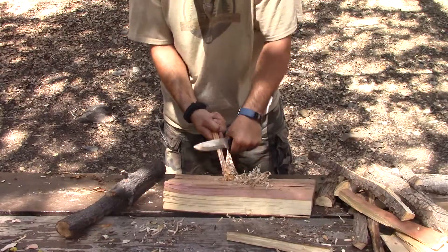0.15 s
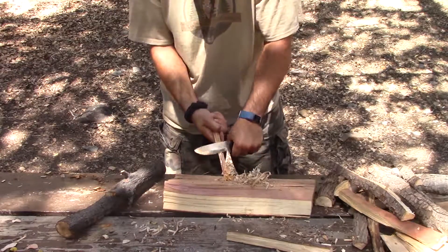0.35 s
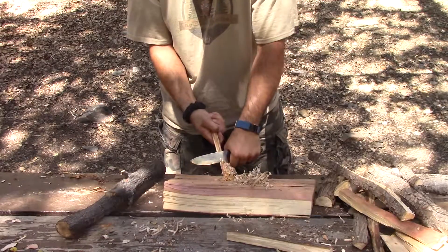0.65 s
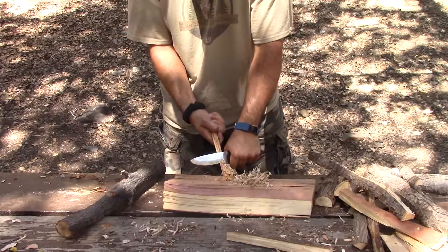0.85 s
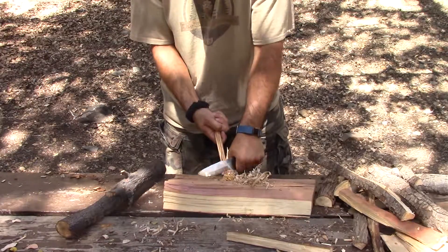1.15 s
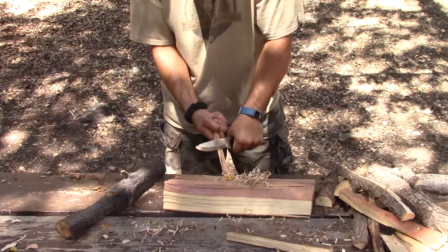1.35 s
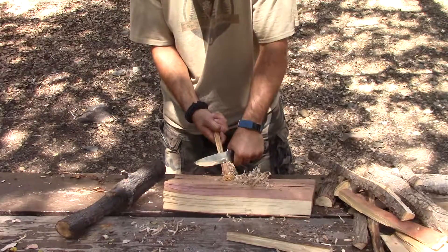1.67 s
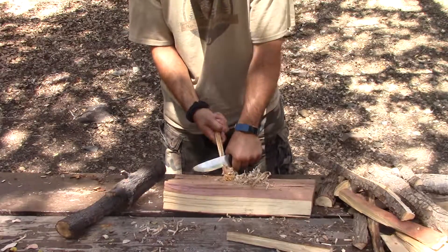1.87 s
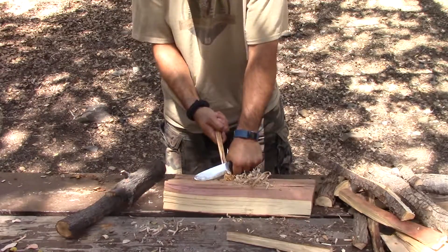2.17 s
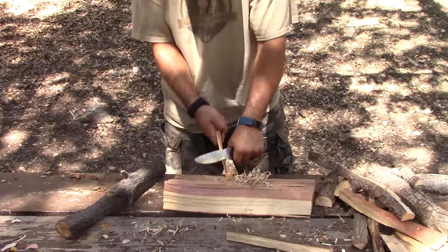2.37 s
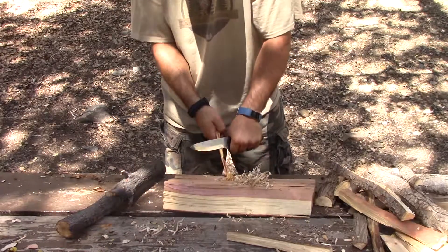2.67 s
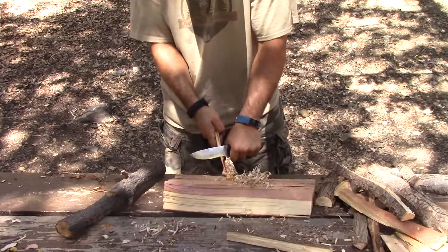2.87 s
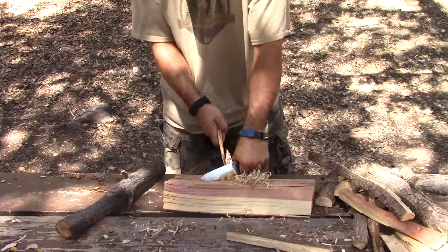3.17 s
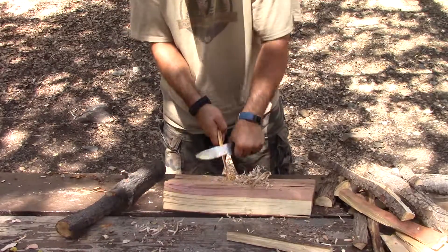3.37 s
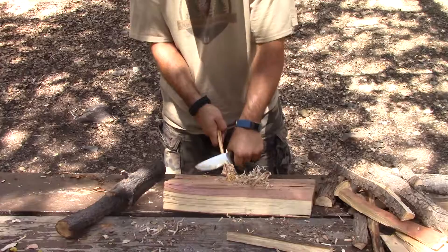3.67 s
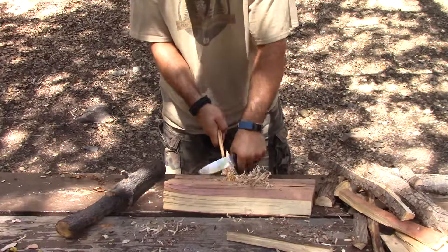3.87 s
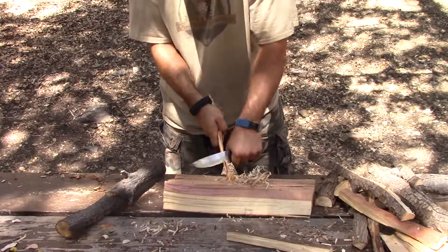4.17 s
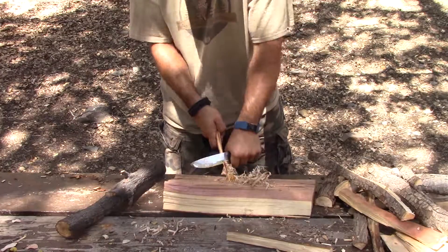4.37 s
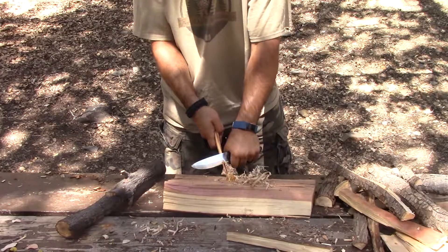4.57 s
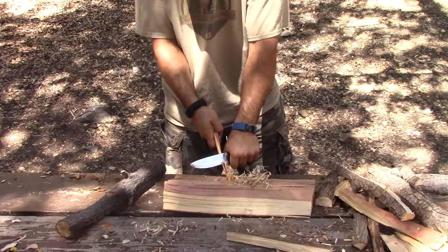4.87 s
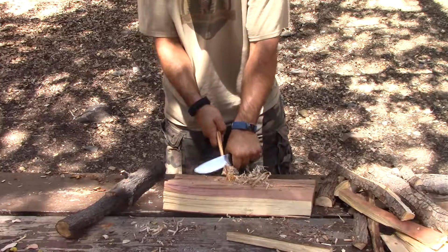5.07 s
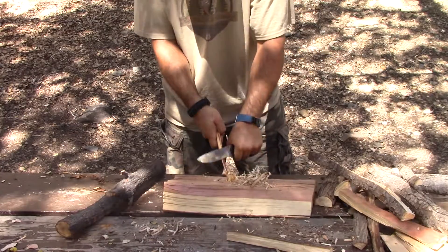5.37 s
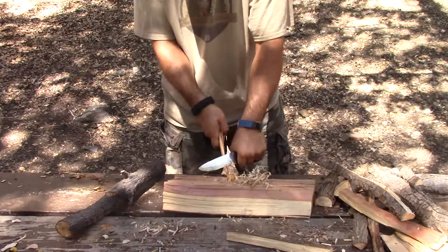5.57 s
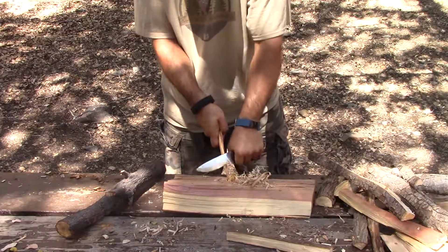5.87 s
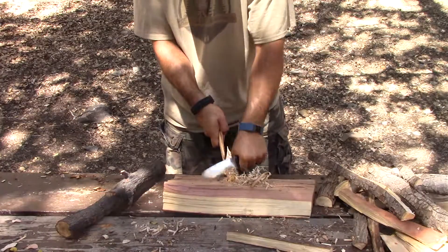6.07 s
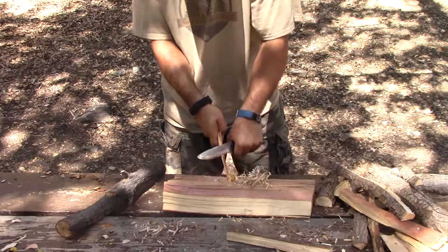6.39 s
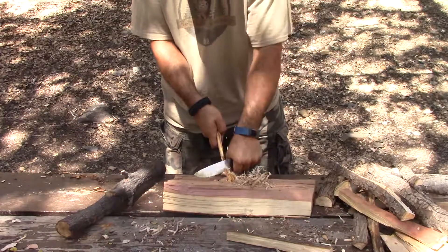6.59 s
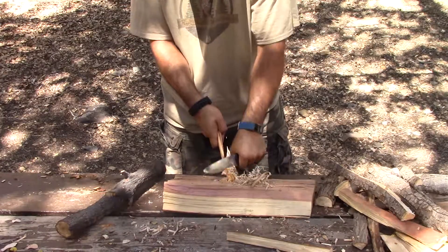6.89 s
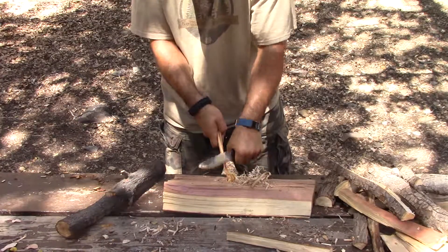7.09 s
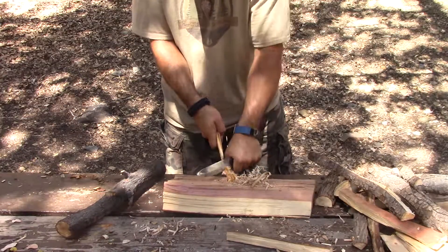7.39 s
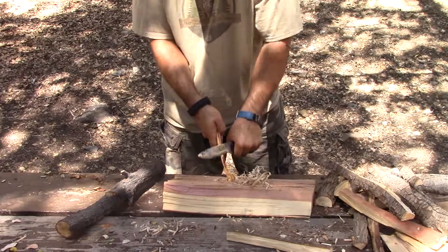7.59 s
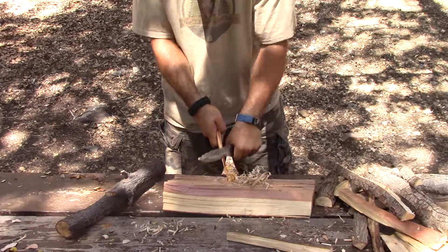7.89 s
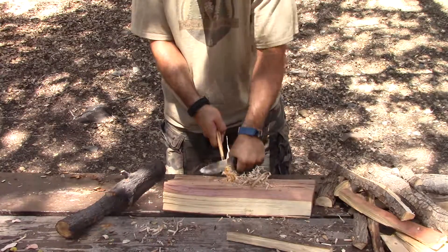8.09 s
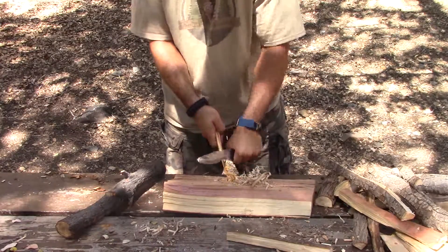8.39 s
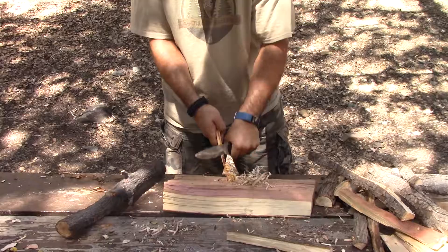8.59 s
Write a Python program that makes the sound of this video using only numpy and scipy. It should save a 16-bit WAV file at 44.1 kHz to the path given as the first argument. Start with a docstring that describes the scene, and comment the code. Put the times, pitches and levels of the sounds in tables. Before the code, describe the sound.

A knife whittles a stick braced on a wooden block outdoors. Short, uneven rasping strokes tear the fibres and resonate in the wood, with light slides of the blade between cuts and a few crisp splinter snaps. Midway the blade catches with a sharp knock, then the strokes grow louder and more regular. A breeze bumps the microphone now and then, over a soft hush with a faint distant bird and insect.

```python
"""Whittling a stick outdoors

A knife shaves curls from a stick whose tip rests on a wooden block. Each stroke tears fibres in a
rapid, uneven chatter that rings stick and block and sinks in pitch as the curl grows. The blade slides
back lightly between cuts and splinters snap. A breeze buffets the microphone, the table thuds dully
under some strokes; far off, a bird and an insect.
"""
import sys
import numpy as np
from scipy import signal
from scipy.fft import rfft, irfft
from scipy.io import wavfile
from scipy.ndimage import uniform_filter1d

SR = 44100
rng = np.random.default_rng(int(sys.argv[2]) if len(sys.argv) > 2 else 0)


def to_wav(sig):
    """Store sig (one row per channel, or 1-D mono) as 16-bit WAV at the path in sys.argv[1].

    Samples outside -1..1 are clipped; the rate is SR.
    """
    pcm = np.clip(np.atleast_2d(sig), -1, 1) * 32767
    pcm = np.round(pcm).astype(np.int16)
    wavfile.write(sys.argv[1], SR, pcm.T)  # frames by channels


N = 385434
TIME = np.arange(N) / SR

# cutting strokes: start/s, swell/s, taper/s, stick rasp/dB, block knock/dB, edge hiss/dB (relative)
STROKES = [(0.929, 0.063, 0.033, -39.5, -37, -54.5), (2.038, 0.044, 0.079, -48, -42.5, -64),
           (2.748, 0.049, 0.097, -38, -36.5, -60), (3.008, 0.046, 0.17, -43, -41, -58.5),
           (3.581, 0.033, 0.06, -43.5, -41.5, -61.5), (3.675, .055, 0.099, -37.5, -34.5, -54.5),
           (4.096, 0.058, 0.17, -40, -37, -58.5), (5.125, 0.033, 0.056, -35, -47, -54),
           (5.221, 0.031, 0.028, -46.5, -61, -52), (5.607, 0.016, 0.061, -42.5, -34.5, -57.5),
           (5.759, 0.0085, 0.048, -42.5, -37.5, -57.5), (6.104, 0.035, 0.076, -38.5, -34, -53),
           (6.499, 0.082, 0.078, -34.5, -30.5, -53), (6.913, .053, .062, -39.5, -35.5, -52.5),
           (7.276, 0.073, 0.081, -33, -29, -52.5), (7.669, 0.091, 0.046, -30, -30.5, -50),
           (8.061, 0.058, .04, -35, -31.5, -51.5), (8.384, 0.084, 0.069, -31, -27, -50)]
# wood resonances: f/Hz, width/Hz, gain/dB
STICK_MODES = [(786, 123, -6), (872, 33, 0.5), (1057, 58, -4), (1208, 90, -2.5), (1293, 62.5, 3),
               (1646, 32, -7.5), (1854, 120, -18), (2590, 48, -28), (2720, 39, -13.5), (3100, 140, -21.5)]
BLOCK_MODES = [(248, 53, -0.5), (281.7, 52, 2), (410.8, 17, 4.5), (486, 42, -6), (519.6, 22, -1),
               (578, 44, -3.5), (701, 39, -7)]
# spectra of tearing fibres and edge hiss: f/Hz, level/dB
FIBRE_SPECTRUM = [(200, -16.5), (500, 5), (900, -5.5), (1500, -1.5), (2200, -15), (3300, -21), (4800, -26),
                  (12000, -45)]
EDGE_SPECTRUM = [(1000, -35), (2500, 11.5), (4700, -0.5), (5900, 6.5), (7500, 1.5), (8300, -3.5),
                 (9600, 4.5), (11000, -17), (12500, -18), (16000, -19)]


def cutting(grain_db=1.0):
    """The same fractures shake stick, block and table; finer ones hiss at the edge and ring the blade."""
    # resonances of the steel and of the table under the block: f/Hz, width/Hz, gain/dB
    blade_modes = [(2704, 220, 17), (3220, 66, 16), (3880, 115, 10.5), (5940, 280, 12), (7170, 390, 9.5),
                   (9300, 440, 6), (10400, 130, -11), (10620, 470, 6)]
    table_modes = [(105, 81, -10.5), (162, 33, -0.5), (213, 22, 6.5)]
    rasp_db, knock_db, hiss_db = np.transpose(STROKES)[3:]
    # the edge hisses just before it bites; the block answers later, as the blade nears it
    rasp = push(rasp_db, light_db=26, shape=2.04, release_s=0.0099)
    knock = push(knock_db, light_db=19, shape=2.02, release_s=0.02, lag_s=0.024)
    hiss = push(hiss_db, light_db=13.5, shape=2.6, release_s=0.0017, lag_s=-0.004)
    thrum = push(knock_db, light_db=28, shape=1.14, release_s=0.013, lag_s=0.021)
    grain = from_db(grain_db * drift(35))   # hard and soft grain varies the force
    rasp, knock, hiss = rasp * grain, knock * grain, hiss * np.sqrt(grain)
    chatter = fractures(per_s=1000, spread_db=4, clump_db=6)
    stick = from_db(-2) * rasp * steady(through(chatter, ringing(STICK_MODES)), size=1800)
    block = from_db(-7) * knock * steady(through(chatter, ringing(BLOCK_MODES)), size=1100)
    table = from_db(-13) * thrum * steady(through(chatter, ringing(table_modes)), size=1800)
    tearing = rasp * fractures(per_s=1800, spread_db=5, clump_db=9)
    fibres = from_db(-7.5) * through(tearing, response(FIBRE_SPECTRUM))
    wood = curl(lowpass(stick + block, 3700, order=4) + fibres)
    fine_tearing = hiss * fractures(per_s=6400, spread_db=7, clump_db=-1)
    edge = from_db(1.5) * through(fine_tearing, response(EDGE_SPECTRUM))
    blade = from_db(2) * steel(hiss * fractures(per_s=6900, spread_db=-0.5, clump_db=6), blade_modes)
    return wood + table + edge + blade


def push(levels_db, light_db, shape, release_s, lag_s=0):
    """One arch of force per stroke: light_db down at entry and exit, then a quick release."""
    gain = np.zeros(N)
    for (start, swell, taper, *_), db in zip(STROKES, levels_db):
        near = slice(int((start - 0.1) * SR), int((start + swell + taper + 0.15) * SR))
        t = TIME[near] - start - lag_s
        off_peak = np.interp(t, [0, swell, swell + taper], [1, 0, 1])
        outside_s = np.maximum(np.maximum(-t, t - swell - taper), 0)
        gain[near] += from_db(db - light_db * off_peak ** shape) * np.exp(-outside_s / release_s)
    return gain


def fractures(per_s, spread_db, clump_db):
    """Fibres give way singly, unevenly and in clumps; the hand keeps the mean force steady."""
    breaks = rng.random(N) < per_s / SR
    clicks = breaks * from_db(spread_db * rng.standard_normal(N)) * rng.choice([-1, 1], N)
    return steady(clicks * from_db(clump_db * drift(220)), size=800)


def curl(x, start_hz=740, end_hz=120, q=2.4, growth_swells=2.09, size=128):
    """The curl is a lengthening spring: a resonant high-pass that falls through each stroke."""
    pitch_hz = np.full(N, float(end_hz))
    for start, swell, *_ in STROKES:
        at = int(start * SR)
        grown = np.minimum(TIME[:N - at] / (growth_swells * swell), 1)
        pitch_hz[at:] = start_hz * (end_hz / start_hz) ** grown
    out, state = np.zeros(N), np.zeros(2)
    for at, hz in zip(range(0, N, size), pitch_hz[::size]):
        r = np.exp(-np.pi * hz / q / SR)
        feedback = [1, -2 * r * np.cos(2 * np.pi * hz / SR), r * r]
        out[at:at + size], state = signal.lfilter([r, -2 * r, r], feedback, x[at:at + size], zi=state)
    return out


def steel(force, modes):
    """The contact passes nodes and antinodes of the blade, so each mode swells and fades by itself."""
    shares = unit_energy(np.array([from_db(db) * np.sqrt(width) for _, width, db in modes]))
    swells = [rms_one(from_db(5 * np.clip(drift(18), -1.5, 1.5))) for _ in modes]
    ring = sum(share * through(force * swell, ringing([mode], size=1024))
               for share, swell, mode in zip(shares, swells, modes))
    return lowpass(ring, 11500, order=6)


def sliding():
    """Under light pressure the flat of the blade whispers over the grain."""
    # light passes: start/s, length/s, rasp/dB, hiss/dB (relative)
    passes = [(0.046, .26, -59.5, -69.5), (0.312, .172, -48.5, -61.5), (0.42, .276, -57, -65),
              (1.222, .158, -60, -64), (1.51, .187, -53, -64), (1.797, .295, -54, -62),
              (2.396, .19, -58, -68), (2.653, .11, -52.5, -66), (3.321, .19, -52, -65),
              (3.897, .17, -52.5, -64.5), (5.296, .074, -53, -64), (5.62, 0.15, -60, -60),
              (6.66, .196, -71, -70.5), (7.49, .157, -58, -71), (7.89, .142, -62, -66.5),
              (8.275, .078, -58.5, -63), (8.64, .073, -65, -64)]
    # resonances of the rubbed wood and the blade's flat: f/Hz, width/Hz, gain/dB
    rub_modes = [(1046, 24, 13.5), (1280, 40, 17), (1560, 190, -1)]
    flat_modes = [(3000, 400, 12.5), (3830, 160, -9), (5420, 410, 0), (6170, 630, 4), (7400, 370, -6),
                  (9060, 560, -6)]
    rasp, hiss = np.zeros(N), np.zeros(N)
    for start_s, length_s, rasp_db, hiss_db in passes:
        touch = np.sqrt(np.hanning(int(length_s * SR)))
        add(rasp, start_s, from_db(rasp_db) * touch)
        add(hiss, start_s, from_db(hiss_db) * touch)
    rub = fractures(per_s=10000, spread_db=4, clump_db=4.5) * from_db(2.5 * drift(45))
    body = from_db(-6.5) * ringing(rub_modes) + from_db(-0.1) * response(FIBRE_SPECTRUM)
    wood = through(rasp * rub, body)
    flat = from_db(4.7) * steel(hiss * rub * rng.choice([-1, 1], N), flat_modes)
    edge = from_db(-12) * through(hiss * rub * rng.choice([-1, 1], N), response(EDGE_SPECTRUM))
    return wood + flat + edge


def knocks(decay_cycles=1.4, crunch_s=0.0032, size=4096):
    """The blade catches: a dead blow with a brief crunch; stick and block ring on faintly."""
    # catches: t/s, relative peak/dB, f/Hz
    catches = [(0.37, -38.5, 824), (0.943, -34, 667), (1.028, -27.5, 2100), (1.039, -41, 1500),
               (1.28, -47, 860), (2.132, -36, 550), (2.772, -35, 730), (3.057, -34, 1330),
               (3.091, -33, 740), (3.196, -37, 970), (3.445, -45, 1030), (3.802, -35, 525),
               (4.127, -40.5, 905), (4.277, -42.5, 1620), (4.558, -44.5, 565), (5.147, -25.5, 1030),
               (5.155, -26.5, 1410), (5.178, -18, 770), (5.267, -34.5, 1670), (6.127, -34.5, 1320)]
    out, t = np.zeros(N), TIME[:size]
    body = lowpass(from_db(-5.5) * ringing(STICK_MODES) + from_db(-4) * ringing(BLOCK_MODES), 3000, 2)
    for s, db, hz in catches:
        burst = rng.standard_normal(size) * np.exp(-t / crunch_s)
        crunch = through(burst, response(FIBRE_SPECTRUM))[:size]
        thud = np.sin(2 * np.pi * hz * t) * t * np.exp(-2 * t * hz / decay_cycles)
        blow = unit_energy(thud) + body + from_db(-2) * unit_energy(crunch)
        add(out, s, from_db(db + 8) * blow / np.abs(blow).max())
    return out


def snaps(crack_s=0.0021, tail_s=0.0061, tail_db=-15, size=1400):
    """A splinter breaks in a bright crack; the last fibres tear away in a few milliseconds."""
    # splinter breaks: t/s, peak/dB
    breaks = [(0.054, -31), (1.0154, -43), (1.0298, -26), (1.301, -43), (1.9771, -24.5), (2.287, -38),
              (2.369, -41), (2.4465, -41.5), (4.554, -42.5), (4.81, -44), (5.7347, -30), (5.7399, -28),
              (5.7972, -32.5)]
    # crack spectrum: f/Hz, level/dB
    spectrum = [(300, -49), (1500, 6.5), (2600, -0.5), (4000, -0.5), (6500, 4.5), (10000, -0.5),
                (13000, -8), (16000, -11)]
    out, t = np.zeros(N), TIME[:size]
    decay = np.exp(-t / crack_s) + from_db(tail_db) * np.exp(-t / tail_s)
    for s, db in breaks:
        crack = through(rng.standard_normal(size) * decay, response(spectrum))
        add(out, s, from_db(db) * crack / np.abs(crack).max())
    return out


def yard(x, t60_s=0.17, wet_db=-15, size=16384):
    """Table, ground and trees scatter a faint, short tail."""
    t = TIME[:size]
    tail = unit_energy(rng.standard_normal(size) * from_db(-60 * t / t60_s) * (t > 0.005))
    return x + from_db(wet_db) * through(lowpass(x, 3000, order=1), tail)


def rumble(lump_db=3, upper_growth=1.54):
    """Lumpy low noise: breeze on the microphone, plus dull table thuds under some knife strokes."""
    # low rumble level: t/s, level/dB
    levels = [(0.0, -51), (0.36, -45.5), (0.41, -25.5), (0.51, -44.5), (0.56, -29.5), (0.63, -51),
              (1.22, -58), (1.31, -36), (1.6, -51.5), (1.65, -33), (1.75, -58.5), (1.85, -40), (2.43, -52),
              (2.94, -39), (3.21, -60), (4.16, -57.5), (4.18, -41.5), (4.53, -72), (4.55, -46.5),
              (5.11, -77), (5.16, -41), (5.47, -72), (5.6, -41.5), (6.52, -67.5), (6.6, -49.5),
              (7.16, -56.5), (8.03, -56.5), (8.15, -28.5), (8.3, -40), (8.74, -44.5)]
    # spectra of the deep and upper bands: f/Hz, level/dB
    deep_spectrum = [(25, -56.5), (50, -10), (80, -6), (130, 4), (200, 2), (300, -8), (450, -23.5),
                     (800, -33.5), (6000, -93)]
    upper_spectrum = [(80, -38.5), (200, 6.5), (320, 1), (520, -8.5), (800, -17.5), (1400, -40.5),
                      (9000, -91)]
    level_db = np.interp(TIME, *np.transpose(levels)) + lump_db * drift(55)
    deep = from_db(level_db - 0.27) * steady(noise(deep_spectrum), size=2200)
    upper_db = -55 + upper_growth * (np.minimum(level_db, -38) + 46)
    return deep + from_db(upper_db) * noise(upper_spectrum)


def eddies(width_s=0.0036, wander=0.23, size=4096):
    """An eddy swells and dies within a few uneven pressure swings."""
    # eddies hitting the microphone: t/s, relative peak/dB, f/Hz
    hits = [(0.268, -30, 132), (0.411, -12, 161), (0.417, -9.5, 265), (0.56, -25.5, 160),
            (1.301, -25.5, 261), (1.324, -17.5, 223.3), (1.374, -25, 333), (1.413, -19.5, 236),
            (1.661, -17, 199.6), (1.847, -21.5, 196.4), (1.921, -22, 189.6), (2.576, -24.5, 157.6),
            (2.926, -24, 164), (2.979, -28, 170.4), (4.561, -31, 170.7), (5.604, -29.5, 126),
            (5.828, -28, 137.5), (8.152, -12, 183.3), (8.197, -9.5, 170), (8.235, -16, 182)]
    out, t = np.zeros(N), TIME[:size] - size / 2 / SR
    for s, db, hz in hits:
        uneven = rms_one(uniform_filter1d(uniform_filter1d(rng.standard_normal(size), 90), 90))
        phase = 2 * np.pi * np.cumsum(hz * np.exp(wander * uneven)) / SR
        add(out, s + t[0], from_db(db - 6.5) * np.sin(phase) / np.cosh(t / width_s))
    return out


def bird(hz=3300, level_db=-67.5, first_s=0.58, every_s=0.8, width_s=0.11, count=7):
    """A distant bird repeats one thin whistle."""
    notes = sum(np.exp(-((TIME - first_s - k * every_s) / width_s) ** 2) for k in range(count))
    pitch_hz = hz * from_db(0.065 * drift(44))
    return from_db(level_db) * notes * np.sin(2 * np.pi * np.cumsum(pitch_hz) / SR)


def insect(hz=2250, width_hz=420, per_s=27, level_db=-63, tick_s=0.0061, size=1024):
    """A distant insect ticks almost evenly, each tick a tiny buzz in one resonance."""
    tick = np.exp(-((TIME[:size] - size / 2 / SR) / tick_s) ** 2)
    ticks, s = np.zeros(N), 0
    while s < TIME[-1]:
        gap, loudness = rng.standard_normal(2)
        add(ticks, s, from_db(level_db + 2 * loudness) * tick)
        s += from_db(1.3 * gap) / per_s
    resonance = ringing([(hz, width_hz, 0)])
    buzz = through(through(rng.standard_normal(N), resonance), resonance)
    return ticks * steady(buzz, size=400)


def air(level_db=-56.5):
    """Soft, even outdoor hush."""
    # ambient spectrum: f/Hz, level/dB
    spectrum = [(30, -36), (60, 6.5), (130, -0.5), (400, 0.5), (1100, -5.5), (1800, -9.5), (3200, -15),
                (6000, -19.5), (11000, -27.5), (16000, -44)]
    return from_db(level_db) * noise(spectrum)


def from_db(db):
    return 10 ** (np.asarray(db) / 20)


def rms_one(x):
    return x / np.sqrt(np.mean(x ** 2) + 1e-20)


def unit_energy(x):
    return x / np.sqrt(np.sum(x ** 2))


def steady(x, size):
    """Hold the local rms at 1."""
    return x / np.sqrt(np.maximum(uniform_filter1d(x ** 2, size), 0) + 1e-5)


def drift(per_s):
    """Random wander of rms 1, with per_s knots a second."""
    knots = rng.standard_normal(N // 8)
    return rms_one(np.interp(TIME * per_s, np.arange(len(knots)), knots))


def response(spectrum, size=4096):
    """Minimum-phase impulse response of a smooth spectrum."""
    hz, db = np.transpose(spectrum)
    grid_hz = np.maximum(np.linspace(0, SR / 2, size // 2 + 1), 1)
    gain = from_db(np.interp(np.log(grid_hz), np.log(hz), db))
    cepstrum = irfft(np.log(gain))
    return unit_energy(irfft(np.exp(rfft(2 * cepstrum[:size // 2], size))))


def ringing(modes, size=4096):
    """Impulse response of damped modes of alternating sign."""
    out, t = np.zeros(size), TIME[:size]
    for k, (hz, width_hz, db) in enumerate(modes):
        envelope = from_db(db) * width_hz * np.exp(-np.pi * width_hz * t)
        out += (-1) ** k * envelope * np.cos(2 * np.pi * hz * t)
    return unit_energy(out)


def through(x, impulse):
    return signal.oaconvolve(x, impulse)[:N]


def noise(spectrum):
    return through(rng.standard_normal(N), response(spectrum))


def lowpass(x, hz, order):
    return signal.sosfilt(signal.butter(order, hz, fs=SR, output="sos"), x)


def add(track, start_s, sound):
    at = max(int(start_s * SR), 0)
    track[at:at + len(sound)] += sound[:N - at]


def scene():
    hush = air()
    knife = yard(cutting() + sliding() + knocks() + snaps())
    lows = rumble() + eddies()
    lull = from_db(-5 * np.exp(-((TIME - 0.75) / 0.2) ** 2))   # the background dips briefly
    return (knife + lows + lull * (hush + bird() + insect()))[None]


def record(dry, low_hz=68, top_hz=15900):
    """The microphone sheds the deepest rumble; the top is cut."""
    thin = signal.sosfilt(signal.butter(3, low_hz, "high", fs=SR, output="sos"), dry)
    return signal.sosfilt(signal.ellip(10, 0.1, 80, top_hz, fs=SR, output="sos"), thin)


dry = scene()
out = record(dry)
to_wav(out)
```